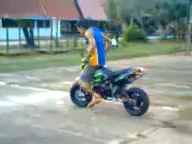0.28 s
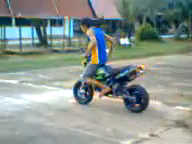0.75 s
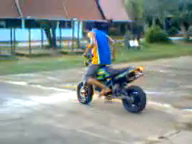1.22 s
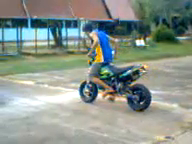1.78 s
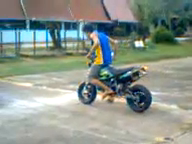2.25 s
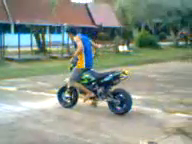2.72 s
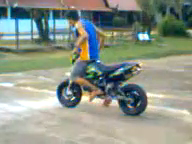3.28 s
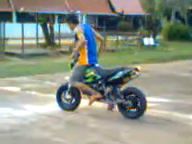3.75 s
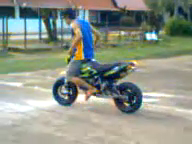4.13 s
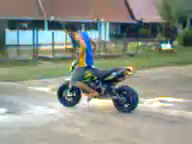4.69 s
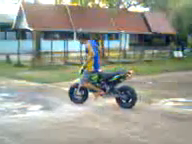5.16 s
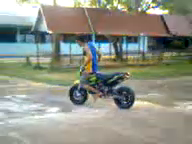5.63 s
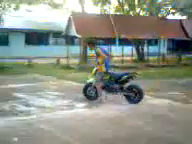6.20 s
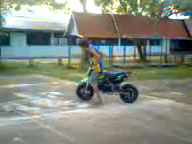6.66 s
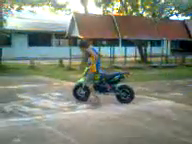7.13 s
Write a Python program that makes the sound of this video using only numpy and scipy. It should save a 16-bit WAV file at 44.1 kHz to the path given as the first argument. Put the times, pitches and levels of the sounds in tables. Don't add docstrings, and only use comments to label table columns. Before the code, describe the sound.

Outdoors, a small single-cylinder bike putters, then its spinning tyre shrieks in stuttering squeals and chirps with water spray, heard through a harsh, narrow phone microphone.

```python
import sys
import numpy as np
from scipy import signal
from scipy.fft import rfft, irfft, next_fast_len
from scipy.io import wavfile

SR = 44100
rng = np.random.default_rng(int(sys.argv[2]) if len(sys.argv) > 2 else 0)


def volts(x):
    e = np.asarray(x, float) / 20
    return 10 ** e


def store_pcm(level_fs):
    pcm = np.round(np.clip(level_fs, -1, 1) * 32767).astype(np.int16)
    wavfile.write(sys.argv[1], SR, np.atleast_2d(pcm).T)


N = 326340


def unit(x):
    return x / np.sqrt(np.mean(np.abs(x) ** 2) + 1e-20)


def along(points, hz):
    f, v = np.transpose(points)
    return np.interp(np.log(hz + 1), np.log(f + 1), v)


def curves(rows):
    s, *cols = np.transpose(rows)
    return [np.interp(np.arange(N) / SR, s, c, left=c[0]) for c in cols]


def filtered(x, response):
    m = next_fast_len(N + SR // 2)
    return irfft(rfft(x, m) * response(np.fft.rfftfreq(m, 1 / SR)), m)[:N]


def resonances(modes):
    def response(f):
        total = 0
        for k, (centre, width, db) in enumerate(modes):
            ring = 1j * f * width / (centre * centre - f * f + 1j * f * width)
            total = total + (-1) ** k * volts(db) * ring
        return total
    return response


def causal(points):
    def response(f):
        c = irfft(np.maximum(along(points, f), -70) * np.log(10) / 20)
        c[1:len(f) - 1] *= 2
        c[len(f):] = 0
        return np.exp(rfft(c))
    return response


def flutter(width_hz, skirt_db, flat):
    def shape(f):
        return np.exp(-(f / width_hz) ** 2) + volts(skirt_db) / (1 + (f / (3 * width_hz)) ** 2)

    real_part = filtered(rng.standard_normal(N), shape)
    z = unit(real_part + 1j * filtered(rng.standard_normal(N), shape))
    return unit(z / (np.abs(z) + 0.14) ** flat)


def bursts(rows, bed_db, rise_db_s, fall_db_s):
    t, level = np.arange(N) / SR, bed_db
    for s, length, db, _ in rows:
        before, after = np.maximum(s - t, 0), np.maximum(t - s - length, 0)
        level = np.maximum(level, db - rise_db_s * before - fall_db_s * after)
    s, length, _, hz = np.transpose(rows)
    ends = np.ravel([s, s + length], order="F")
    return level, np.interp(t, np.maximum.accumulate(ends), np.repeat(hz, 2))


def spray_and_road():
    # time in seconds, strength in
    # dB.
    spray = [(0.0, -35.5), (0.5, -46), (0.91, -44), (1.28, -47.5), (1.44, -37), (1.89, -37), (2.15, -41.5),
             (2.62, -50.5), (3.32, -44), (3.79, -43.5), (4.24, -55.5), (4.7, -48), (5.46, -50),
             (6.0, -47.5), (6.1, -35), (6.28, -52.5), (7.1, -44), (7.4, -56.5)]
    # frequency in Hz, strength in dB per Hz.
    hiss_colour = [(60, -16.5), (150, 7.5), (450, 4.5), (900, 1.5), (1300, 2), (2000, -1.5), (2800, 8.5),
                   (3600, 0.5), (4300, -10.5)]
    # frequency in Hz, strength in dB per Hz.
    rumble_colour = [(10, -23.5), (30, -4), (70, -2), (120, -5.5), (200, -11.5), (400, -40)]
    (hiss_db,) = curves(spray)
    rumble_db = -50.5 + 1.1 * (hiss_db + 49.5)
    spurt_db = 9.1 * np.real(flutter(width_hz=80, skirt_db=-11.0, flat=0))
    spurts = volts(np.minimum(spurt_db, 8.0))
    hiss = unit(filtered(spurts * rng.standard_normal(N), lambda f: volts(along(hiss_colour, f))))
    rumble = unit(filtered(rng.standard_normal(N), lambda f: volts(along(rumble_colour, f))))
    return volts(hiss_db + 10.0) * hiss + volts(rumble_db) * rumble


def engine():
    # time in seconds, firings per second.
    speed = [(0.0, 29.34), (0.49, 28.09), (1.02, 28.29), (1.31, 27.77), (1.53, 29.38), (1.67, 32.38),
             (2.18, 37.66), (2.46, 36.06), (2.72, 35.96), (3.34, 37.88), (3.58, 36.6), (3.92, 37.24),
             (4.2, 33.27), (4.48, 34.9), (4.82, 33.32), (5.38, 27.37), (5.96, 38.41), (6.1, 38.4)]
    # time in seconds, loudness in dB, load from 0 to 1.
    exhaust = [(0.0, -28, .5), (0.35, -28.5, .6), (0.66, -23, 0.26), (1.05, -22, .35), (1.42, -26, 0.42),
               (1.58, -25.5, 0.69), (1.8, -34, 0.6), (2.1, -38.5, 0.9), (2.55, -48.5, .95), (3.05, -42, .6),
               (3.28, -37, 0.8), (3.81, -43, 0.5), (4.06, -42.5, 0.4), (4.7, -41.5, 0.4),
               (4.98, -32.5, 0.1), (5.2, -40.5, .2), (6.08, -36, 0.3), (6.28, -57.5, .7)]
    # frequency in Hz, strength in dB.
    pipe = [(47, -53), (80, -19.5), (108, -18.5), (155, -6), (193, 3), (247, -13), (270, -5), (306, -10.5),
            (327, -7.5), (378, -5.5), (402, -6.5), (421, -12.5), (449, -22), (700, -33), (910, -61.5),
            (1540, -120)]
    # frequency in Hz, width in Hz, strength in dB.
    silencer = [(1206, 304, 7), (2481, 240, 4.5), (3317, 620, -1)]
    (rate,), (thump_db, load) = curves(speed), curves(exhaust)
    bark_db = thump_db + 22 * (load - .5)
    turns = 0.21 + np.cumsum(rate) / SR
    cycle, phase = turns.astype(int), turns % 1
    strength = volts(rng.standard_normal((cycle[-1] + 1, 3)) * [1.3, 2.2, 4.5])
    thump_size, gas_size, valve_size = strength[cycle].T

    firing = np.diff(cycle, prepend=cycle[0]) * thump_size
    thump = filtered(firing, causal(pipe))

    since = np.maximum(phase / rate - .0012, 0)
    onset = 1 - np.exp(-since / 0.0024)
    decay = np.exp(-since / 0.0028) + 0.41 * np.exp(-(since / 0.01) ** 2)
    gust = gas_size * onset * decay + 0.081
    knock = 10.0 * np.roll(firing, 90) * gas_size
    bark = filtered(gust * rng.standard_normal(N) + knock, lambda f: resonances(silencer)(f) ** 3)

    snap = valve_size * np.exp(-((phase - .56) / .022) ** 2)
    valve = filtered(snap * rng.standard_normal(N), resonances([(3170, 4300, 0)]))
    return volts(thump_db - 0.5) * unit(thump) + volts(bark_db + 5) * (unit(bark) + volts(-25) * unit(valve))


def grit():
    # time in seconds, peak in dB, pitch in Hz, sharp part in dB.
    stones = [
        (2.764, -29, 974, 21),
        (3.088, -16.5, 596, 10.5),
        (4.531, -16, 470, -1.5),
        (5.028, -10, 820, 1),
        (5.434, -49, 996, 26),
        (5.46, -19.5, 900, -24),
        (5.798, -9.5, 520, -3.5),
        (6.033, -2, 743, -8.5),
        (6.997, -20, 910, 17),
    ]
    out, t = np.zeros(N + SR), np.arange(SR // 50) / SR
    for s, db, hz, tick_db in stones:
        knock = t / 0.0021 * np.exp(1 - t / 0.00086) * np.sin(2 * np.pi * hz * t)
        tick_level = volts(tick_db + 4.0 - 60 * t / .008) * (1 - np.exp(-t / 0.0012))
        tick = tick_level * rng.standard_normal(len(t))
        out[round(s * SR) + 20:][:len(t)] += volts(db + 5.5) * (knock + tick)
    return out[:N]


def tyre():
    # time in seconds, strength in dB.
    steady_slip = [(1.44, -38.5), (1.66, -24), (1.9, -17.5), (2.3, -22.5), (2.74, -23), (3.0, -22.5),
                   (3.3, -26.5), (3.6, -23.5), (4.0, -34), (4.08, -27.5), (4.42, -43.5), (4.65, -29),
                   (4.9, -44), (5.15, -30), (5.47, -40.5), (6.0, -47.5), (6.5, -32), (6.85, -33)]
    # start in seconds, length in seconds, level in dB, pitch in Hz.
    squeals = [(1.69, .06, -10, 1650), (1.78, 0.028, -12.5, 1608), (1.96, 0.008, -8.5, 1653),
               (2.04, 0.017, -14, 1613), (2.12, .08, -16, 1650), (2.21, .13, -9.5, 1565),
               (2.37, 0.087, -12, 1559), (2.45, 0.06, -10, 1558), (2.52, .08, -9, 1571),
               (2.62, .05, -18, 1568), (2.83, .03, -14, 1570), (2.875, .055, -9.5, 1559),
               (2.95, 0.14, -14.5, 1599), (3.1, .06, -21, 1598), (3.36, 0.056, -13.5, 1514),
               (3.47, .04, -16.5, 1514), (3.53, .1, -9, 1541), (3.66, .12, -10.5, 1549),
               (3.81, .11, -9, 1579), (3.93, .065, -9.5, 1571),
               (4.089, .06, -25, 1392), (4.317, 0.017, -26.5, 1570), (4.524, 0.011, -12, 1515),
              (4.71, 0.051, -16, 1460), (4.77, .055, -10, 1451), (4.936, 0.0058, -17.5, 1351),
              (5.03, .05, -22, 1381), (5.215, 0.018, -11.5, 1545), (5.266, 0.007, -12.5, 1509),
              (5.343, 0.011, -24, 1456), (5.379, .015, -23, 1637), (5.624, 0.011, -40, 1416),
              (6.085, .13, -11.5, 1687), (6.211, .07, -12.5, 1624), (6.415, 0.022, -19.5, 1700),
              (6.559, 0.0054, -20.5, 1687), (6.573, 0.013, -12.5, 1700), (6.618, 0.008, -13, 1720),
              (6.643, 0.023, -13.5, 1710), (6.685, 0.0088, -17, 1750), (6.734, 0.004, -22.5, 1782),
              (6.928, .13, -15, 1749), (7.056, 0.031, -16.5, 1829), (7.117, 0.005, -12, 1788),
              (7.137, .02, -16.5, 1810), (7.172, .02, -17.5, 1823), (7.247, .17, -9, 1607)]
    # start in seconds, length in seconds, level in dB, centre in Hz.
    scrapes = [(1.51, .02, -23, 1799), (1.56, .1, -23.5, 1892), (3.085, .015, -27, 2178),
               (4.51, 0.11, -31.5, 2341), (4.76, .07, -25.5, 2787), (5.02, 0.016, -29, 2296),
               (5.435, .012, -33.5, 2370), (5.67, 0.069, -29.5, 2164), (5.745, 0.0092, -20, 2165),
               (5.8, 0.0087, -22, 2094), (5.85, .08, -15.5, 2061), (5.96, 0.011, -11.5, 2185),
               (6.01, 0.027, -16.5, 2135), (6.09, 0.13, -22.5, 1921), (6.55, 0.17, -28, 1997),
               (6.72, .16, -26.5, 2041), (6.9, 0.061, -14, 2076), (6.97, .06, -13, 2065),
               (7.06, 0.16, -20, 2073)]
    (slip_db,) = curves(steady_slip)
    slipping = np.arange(N) >= steady_slip[0][0] * SR

    tone_db, pitch = bursts(squeals, slip_db, rise_db_s=601.5, fall_db_s=402)
    spin = np.exp(2j * np.pi * np.cumsum(pitch) / SR)
    crowd = flutter(width_hz=101.5, skirt_db=-22.0, flat=0.053)
    tone = unit(np.real(spin * crowd))

    pitch_above_hz = np.clip(pitch - 1570, -69.5, 115)
    octave_db = -21 + 1.42 * (tone_db + 8) + 0.12 * pitch_above_hz
    sharp = np.abs(flutter(width_hz=70, skirt_db=-13, flat=-0.55))
    even_crowd = crowd / (np.abs(crowd) + 0.061)
    locked = sharp * np.real((spin * even_crowd) ** 2)
    free = np.real(spin ** 2.16 * flutter(width_hz=130, skirt_db=-3.5, flat=-.25))
    octave = unit(filtered(unit(locked) + volts(-2.0) * unit(free), resonances([(3800, 3800, 0)])))

    scrub_bed_db = 0.75 * (slip_db + 26.5) - 40
    scrub_db, centre = bursts(scrapes, scrub_bed_db, rise_db_s=501.5, fall_db_s=497.5)
    scrub_spin = np.exp(2j * np.pi * np.cumsum(centre) / SR)
    scrub = unit(np.real(scrub_spin * flutter(width_hz=260, skirt_db=-16.5, flat=-0.49)))

    squeal = volts(tone_db + 0.03) * tone + volts(octave_db + 0.2) * octave
    return slipping * (squeal + volts(scrub_db - 2.0) * scrub)


def scene():
    near = spray_and_road() + engine() + grit() + tyre()
    t = np.arange(SR // 5) / SR
    yard = rng.standard_normal(len(t)) * volts(-60 * t / 0.31) * (t > .009)
    echo = signal.fftconvolve(near, yard / np.linalg.norm(yard))[:N]
    return (near + volts(-20.5) * echo)[None]


def roll_off(x):
    return signal.sosfilt(signal.butter(12, 15890, fs=SR, output="sos"), x)


def record(dry):
    # frequency in Hz, strength in dB.
    mic_tone = [(2600, 0.5), (3100, -5.5), (3600, 5), (3850, -0.5), (4100, -7), (4300, -2.5), (4600, -67.5),
                (5000, -120)]
    swell = np.abs(signal.hilbert(dry[0], next_fast_len(N))[:N])
    squashed = dry[0] / (1 + (swell / .76) ** 6.0) ** .15
    narrow = filtered(squashed, lambda f: volts(along(mic_tone, f)))
    clipped = np.clip(narrow, -.71, .71)
    cut_hz = 68
    out = filtered(clipped, lambda f: (1j * f / (1j * f + cut_hz)) ** 2)
    return roll_off(np.clip(out, -.76, .76)[None])


dry = scene()
out = record(dry)
store_pcm(out)
```